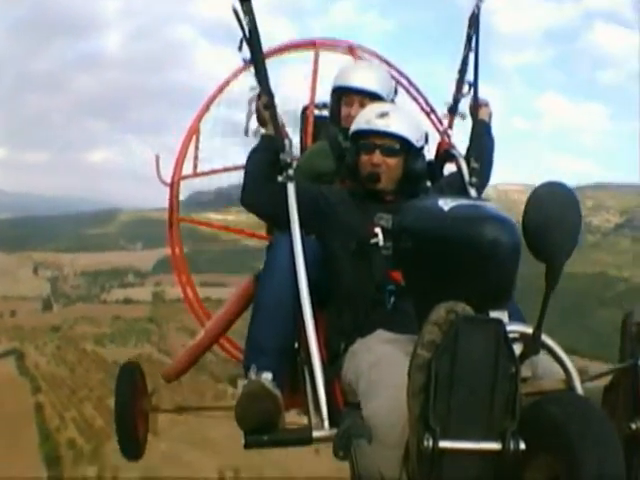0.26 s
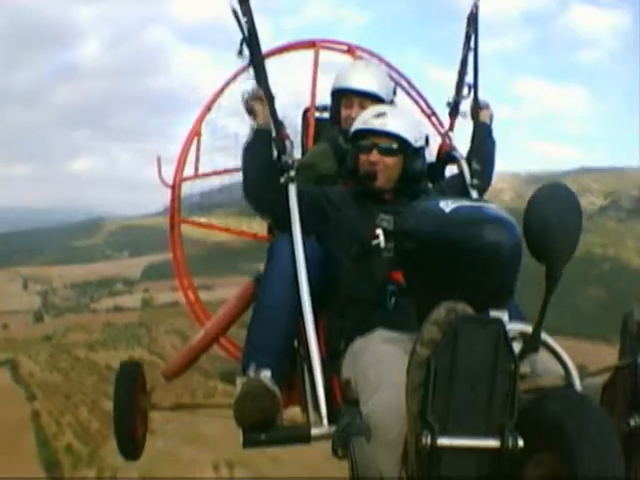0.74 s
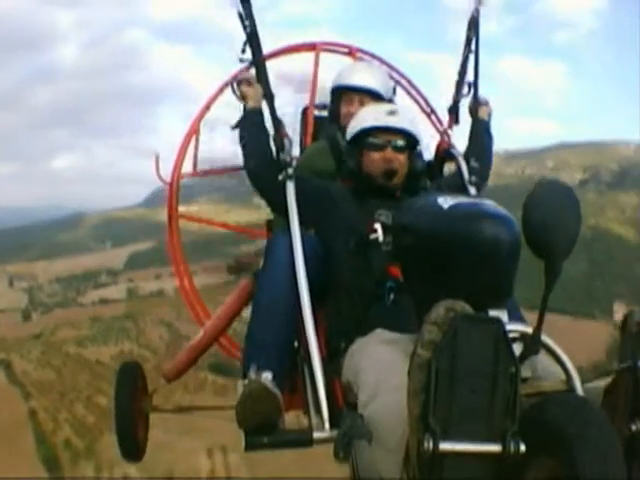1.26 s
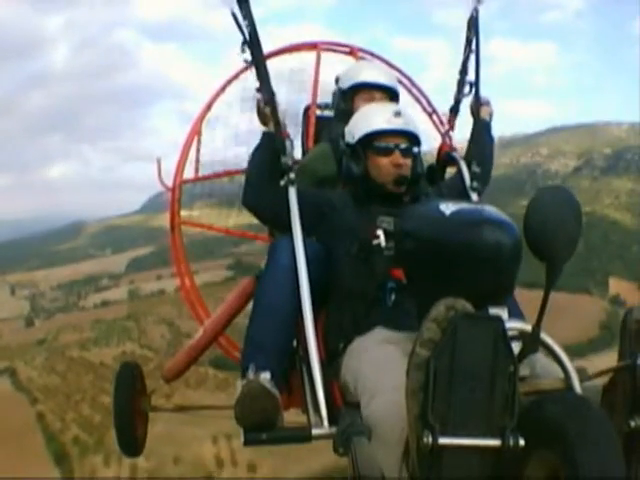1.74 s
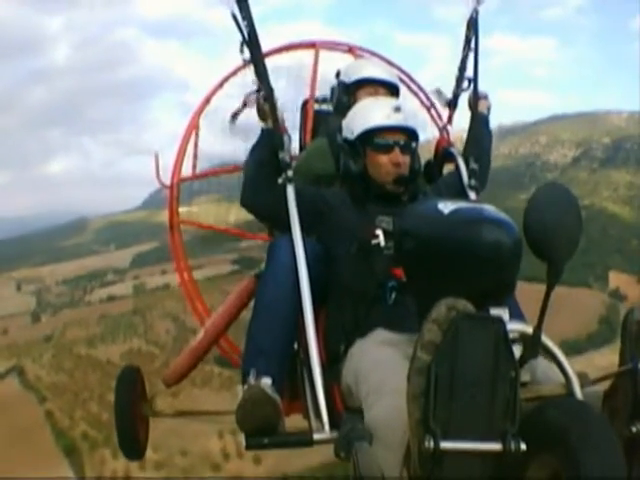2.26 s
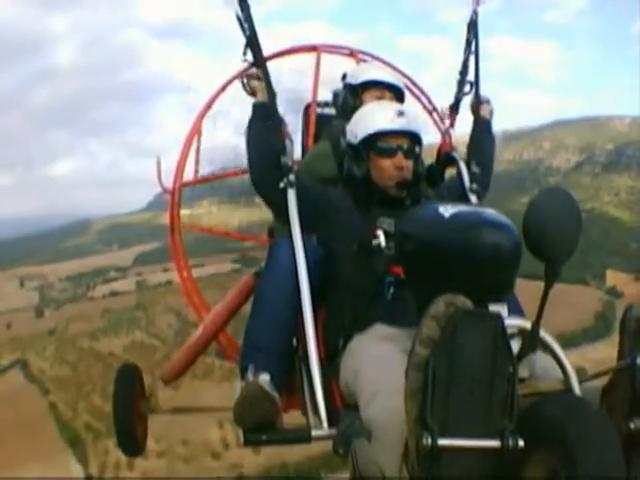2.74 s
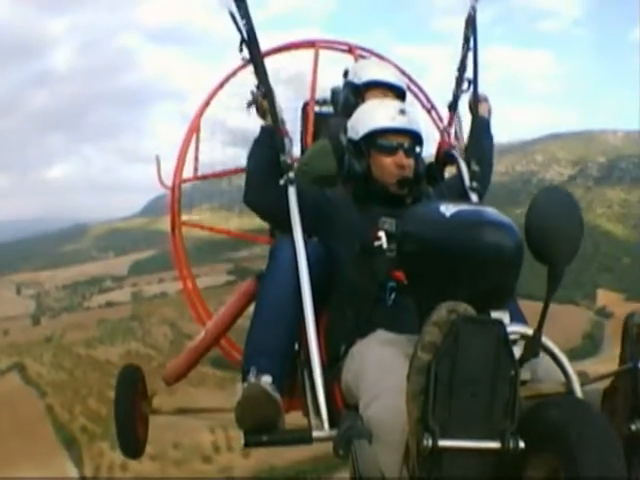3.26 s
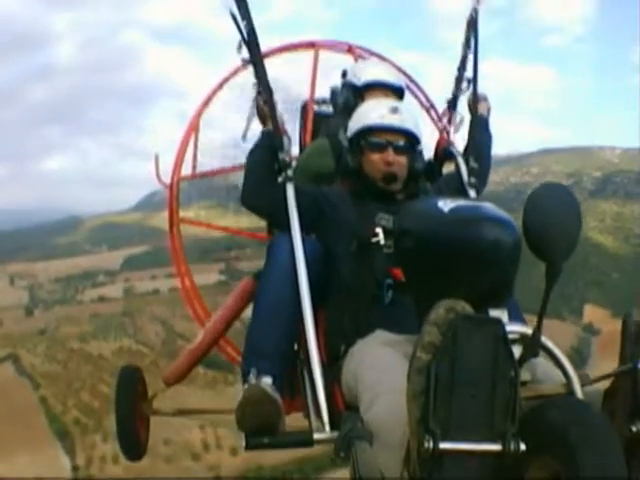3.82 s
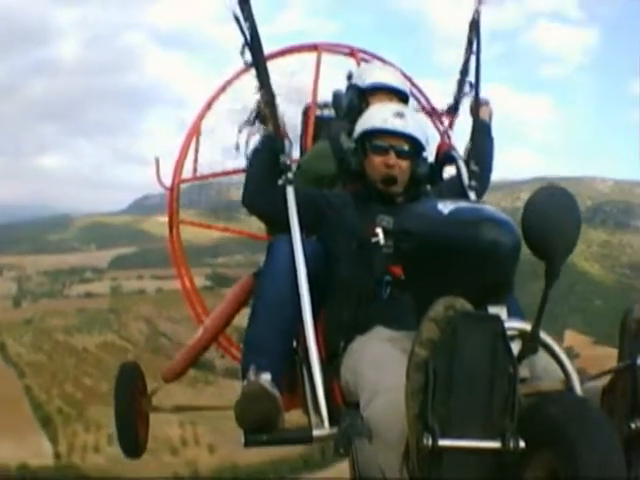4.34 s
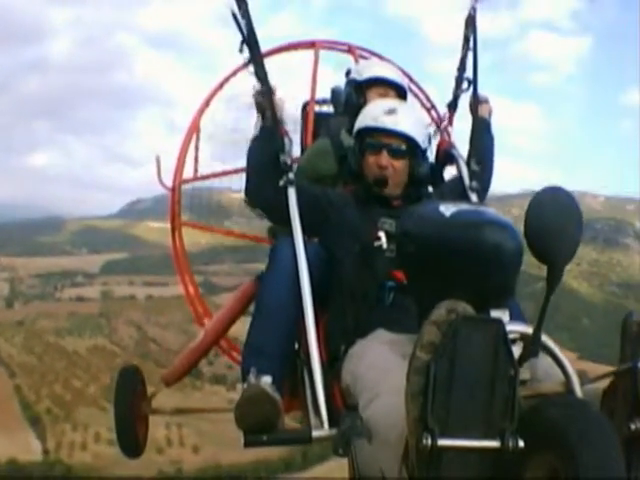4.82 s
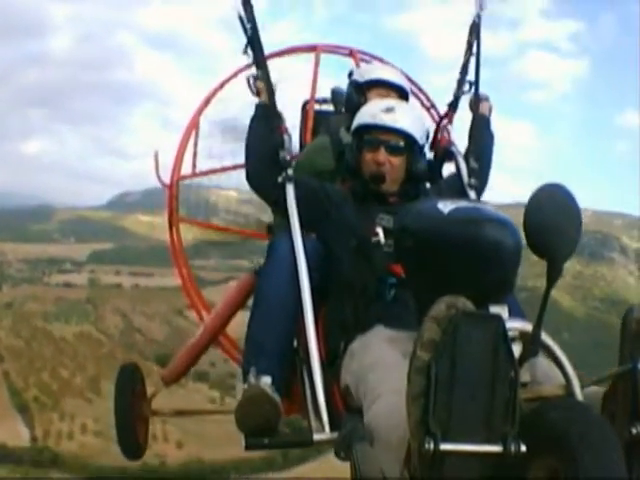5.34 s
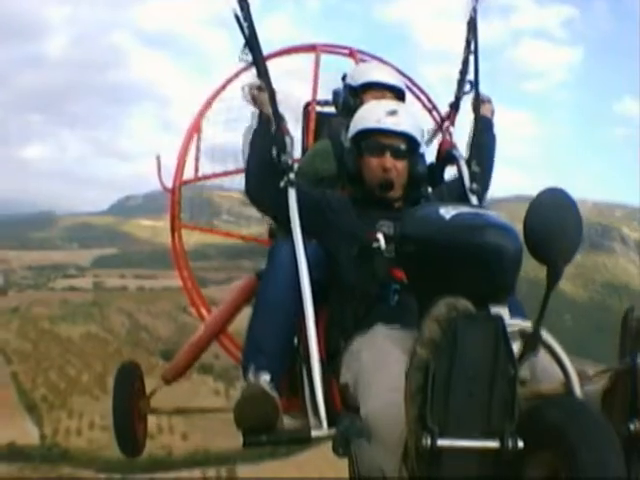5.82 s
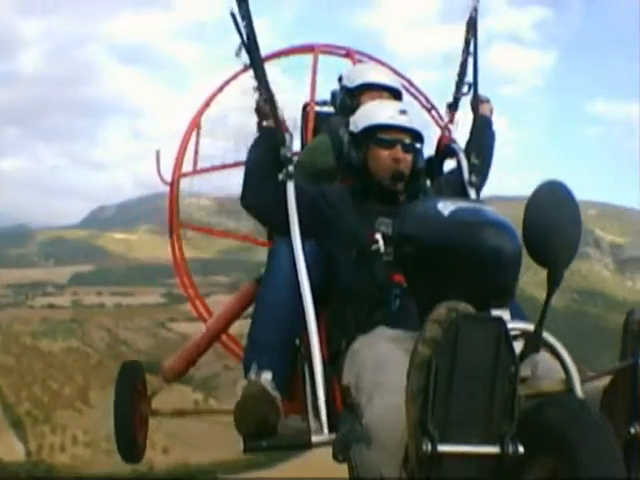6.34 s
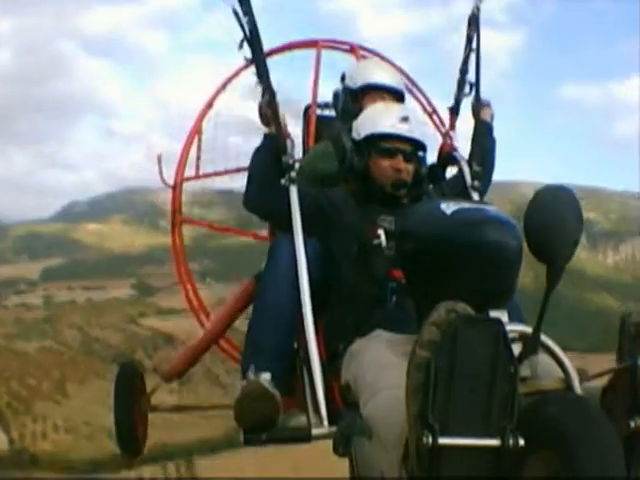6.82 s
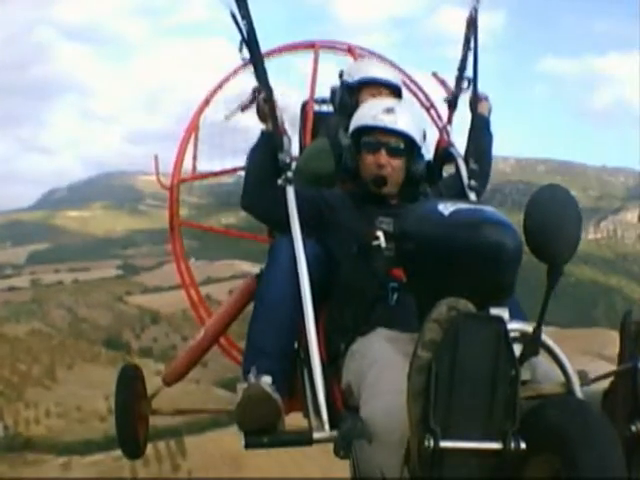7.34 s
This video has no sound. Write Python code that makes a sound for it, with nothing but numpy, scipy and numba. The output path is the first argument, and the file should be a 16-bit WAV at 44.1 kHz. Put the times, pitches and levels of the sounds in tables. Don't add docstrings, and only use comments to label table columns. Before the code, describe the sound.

A small two-stroke engine and propeller drone steadily at cruise, close up, with rushing air and a rough, crackling, overloaded microphone.

```python
import sys
import numpy as np
from scipy import signal
from scipy.fft import rfft, irfft
from scipy.io import wavfile
from scipy.ndimage import uniform_filter1d
from numba import njit

SR = 44100
rng = np.random.default_rng(int(sys.argv[2]) if len(sys.argv) > 2 else 0)


def volts_from_db(level):
    exponent = np.asarray(level, float) / 20
    return 10 ** exponent


def file_out(sig):
    cols = np.atleast_2d(sig).T
    lim = np.clip(cols, -1, 1)
    pcm = np.round(lim * 32767).astype(np.int16)
    wavfile.write(sys.argv[1], SR, pcm)


N = 334278


def walk(rate_hz):
    hold = int(SR / rate_hz)
    steps = np.repeat(rng.standard_normal(N // hold + 1), hold)
    return 1.54 * uniform_filter1d(uniform_filter1d(steps, hold), hold)[:N]


def filtered(x, order, hz, kind):
    return signal.sosfilt(signal.butter(order, hz, kind, fs=SR, output="sos"), x)


def at_level(x, rms_db):
    return volts_from_db(rms_db) * x / np.std(x)


def stack(turns, orders, wander_db, smear_rad, spread_rad):
    out = np.zeros(N)
    for order, db in orders:
        loose = min(order / 6, 1.2)
        level = volts_from_db(db + 2.5 + loose * wander_db * walk(9))
        phase = order * turns + spread_rad * order * order + loose * smear_rad * walk(9)
        out += level * np.sin(phase)
    return out


# frequency in Hz, density in dB per Hz.
RUSH_SPECTRUM = [(25, -21), (60, -24), (130, -15.5), (220, -7.5), (350, -2.5), (650, 1.5), (1000, -2),
                 (1500, -9.5), (2000, -18), (2600, -26), (3600, -29.5), (4300, -47), (5000, -67),
                 (9000, -60)]


def rush(firing, blade):
    hz, db = np.transpose(RUSH_SPECTRUM)
    bins_hz = np.maximum(np.arange(N // 2 + 1) * SR / N, 1)
    tilt = volts_from_db(np.interp(np.log(bins_hz), np.log(hz), db))
    noise = irfft(rfft(rng.standard_normal(N)) * tilt, N)
    chop = 1 + 0.2 * np.cos(firing) + 0.21 * np.cos(blade)
    gust = volts_from_db(0.2 * walk(9) + 0.25 * walk(40))
    return chop * gust * at_level(noise, -16.5)


def ring(blade):
    tone = filtered(rng.standard_normal(N), 1, [2670, 2730], "band")
    return at_level(tone * (1 + 0.3 * np.cos(blade)), -50)


def swish(firing, blade):
    passes = blade / (2 * np.pi)
    burst = 0.14
    for lag_passes, db, decay_passes in [(0, -6, 0.078), (0.47, -3, 0.072)]:
        which, phase = np.divmod(passes + lag_passes, 1)
        size = volts_from_db(db + 2.9 * rng.standard_normal(N // 200))
        burst = burst + size[which.astype(int)] * np.exp(-phase / decay_passes)
    sway = 1 + 0.2 * np.cos(firing / 3)
    hiss = filtered(burst * sway * rng.standard_normal(N), 2, [1700, 4100], "band")
    return at_level(hiss, -38)


# multiple of the blade rate, level in dB rms.
BLADE_PARTIALS = [(.61, -50), (1, -42.5), (2, -48), (2.33, -44.5), (3, -30), (4, -30.5), (5, -30),
                  (6, -33.5), (7, -34), (8, -35), (10, -40), (11, -32.5), (12, -45),          (14, -46),
                  (15, -38), (16, -38.5), (17, -42.5), (18, -44.5), (19, -48)]


def propeller(blade):
    return stack(blade, BLADE_PARTIALS, wander_db=2.0, smear_rad=0.34, spread_rad=0.35)


# multiple of the firing rate, level in dB rms.
EXHAUST_PARTIALS = [(1, -46), (2, -29.5), (3, -24), (4, -28), (5, -26.5), (6, -22), (7, -25.5), (8, -39),
                    (9, -28), (10, -32.5), (11, -32.5), (12, -32.5), (13, -31.5), (14, -45.5), (15, -46.5),
                    (16, -39.5), (17, -48.5), (18, -43), (19, -49.5), (20, -65), (21, -75)]


def engine(firing, t):
    exhaust = stack(firing, EXHAUST_PARTIALS, wander_db=1.5, smear_rad=0.32, spread_rad=0.3)
    bloom_at_s, bloom_half_s, bloom_db = 5.82, 0.78, 14
    bloom = np.exp(-((t - bloom_at_s) / bloom_half_s) ** 4)
    return exhaust + volts_from_db(-34.5 + bloom_db * bloom) * np.sin(4 * firing)


# time in seconds, gain drop in dB.
HARD_SWINGS = [(0.5, 8.5), (0.741, 5.5), (1.123, 7), (1.188, 7), (1.334, 6.5), (1.491, 7), (1.699, 9.5),
               (1.982, 6), (2.215, 6), (2.527, 8), (2.737, 8), (3.048, 5.5), (3.31, 6.5), (3.404, 6.5),
               (3.568, 5), (3.744, 9.5), (3.869, 6.5), (4.356, 6.5), (4.477, 6.5), (4.838, 5), (4.899, 9.5),
               (5.201, 6.5), (5.292, 5), (5.391, 7), (5.502, 5), (5.773, 8), (5.944, 5.8), (6.316, 8),
               (6.65, 9.5), (6.92, 5)]
LESSER_SWINGS = [.076, .402, 0.622, 1.275, 1.569, 1.887, 2.093, 2.37, 4.3, 4.608, 4.758, 5.11, 5.447, 5.642,
                 6.005, 6.105, 6.155, 6.478, 6.583, 6.738, 6.988, 7.468]


def swing_events():
    lesser_drop_db = 4.5
    s, drop_db = np.transpose(HARD_SWINGS + [(s, lesser_drop_db) for s in LESSER_SWINGS])
    return (s * SR).astype(int), drop_db


def swings():
    t = np.arange(-200, 1) / SR
    trough = 0.73 * np.exp(-((t + 0.0014) / 0.00044) ** 2)
    rebound = 1.05 * np.exp(-((t + 0.00069) / 0.00028) ** 2)
    shape = rebound - trough
    window = np.sin(np.pi * np.arange(len(t)) / len(t)) ** 2
    shape = shape - np.mean(shape) * 2 * window
    at, drop_db = swing_events()
    marks = np.zeros(N)
    marks[at - len(t)] = 0.068 * drop_db
    return filtered(signal.fftconvolve(marks, shape)[:N], 2, 250, "high")


# time in seconds, firing rate in Hz, air swell in dB.
CRUISE_COURSE = [(0, 99.96, -0.1), (.6, 99.9, 0.5), (1.0, 99.7, -0.5), (1.3, 99.27, 0), (2.1, 99.52, 0.7),
                 (2.9, 99.76, -.5), (3.7, 99.72, -0.24), (4.4, 99.45, -.5), (5.1, 99.46, 0.5),
                 (5.75, 99.34, 0), (6.15, 99.65, -0.1), (6.5, 98.5, 0.15), (7.0, 98.95, 0),
                 (7.58, 99.67, 0.1)]


def scene():
    t = np.arange(N) / SR
    s, firing_hz, swell_db = np.transpose(CRUISE_COURSE)
    firing = 2 * np.pi * np.cumsum(np.interp(t, s, firing_hz)) / SR
    blade = firing / 1.107
    mix = rush(firing, blade) + ring(blade) + swish(firing, blade) + propeller(blade) + engine(firing, t)
    swell = volts_from_db(np.interp(t, s, swell_db))
    return (swell * mix + swings())[None]


@njit
def duck(x, forced_db, top, bite_db, recover_db):
    y, down_db = np.empty(len(x)), 0.
    for i in range(len(x)):
        y[i] = x[i] * 10 ** (-down_db / 20)
        down_db = max(down_db - recover_db, forced_db[i], 0.)
        down_db += bite_db * max(abs(y[i]) - top, 0.)
    return y


def bend(x):
    x = filtered(x - 0.086 * x * x, 1, 90, "high")
    knee, room = 0.36, 0.26
    x = np.where(x > knee, knee + room * np.tanh((x - knee) / room), x)
    return np.clip(x - 0.007, -0.685, 0.6)


def hold(x):
    up, down = 320, 441
    slow = signal.resample_poly(x, up, down)
    return slow[np.arange(N) * up // down]


def roll_off(x):
    return signal.sosfilt(signal.butter(12, 15700, fs=SR, output="sos"), x)


def record(dry):
    at, drop_db = swing_events()
    forced_db = np.zeros(N)
    forced_db[at] = 1.05 * drop_db
    recover_db_per_s = 171
    x = duck(1.093 * dry[0], forced_db, 0.95, 0.22, recover_db_per_s / SR)
    x = filtered(bend(x), 7, 4500, "low")
    notched = signal.lfilter(*signal.iirnotch(4950, 6, fs=SR), x)
    x = notched * 0.29 + x * 0.69
    return roll_off(hold(x)[None])


dry = scene()
out = record(dry)
file_out(out)
```